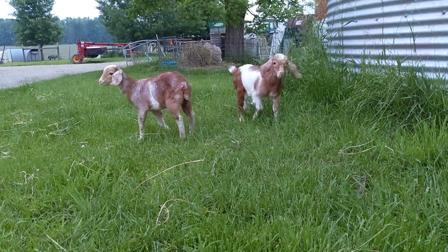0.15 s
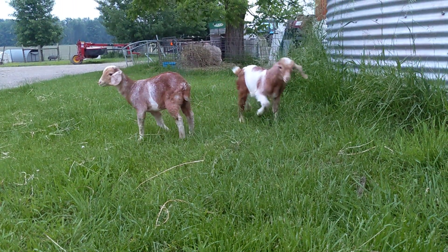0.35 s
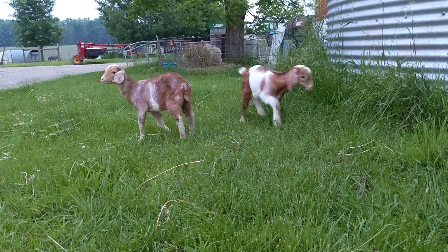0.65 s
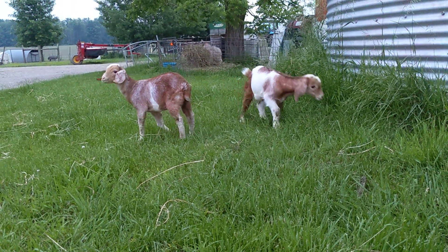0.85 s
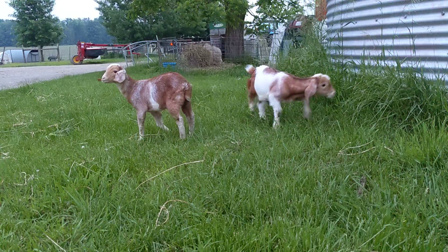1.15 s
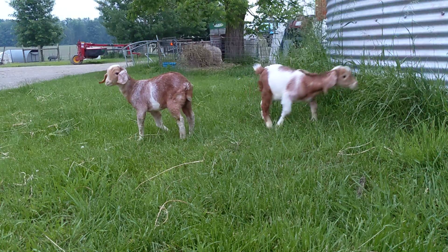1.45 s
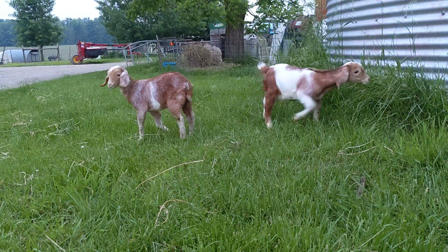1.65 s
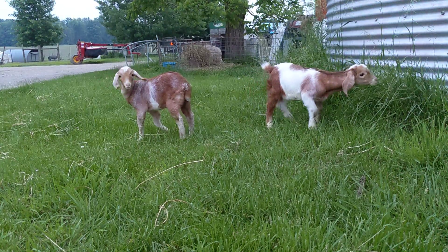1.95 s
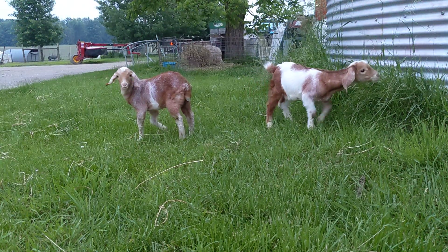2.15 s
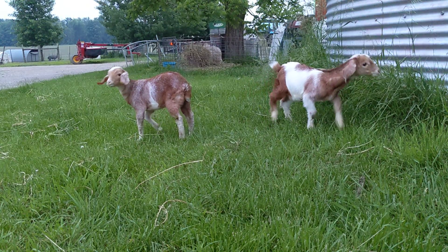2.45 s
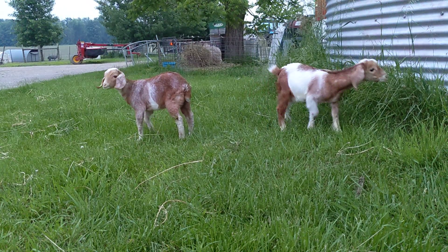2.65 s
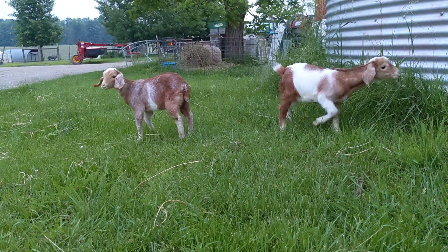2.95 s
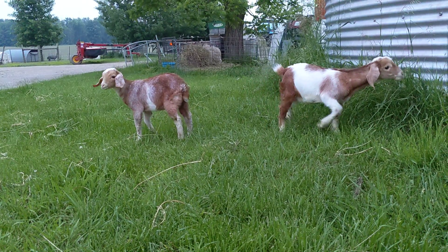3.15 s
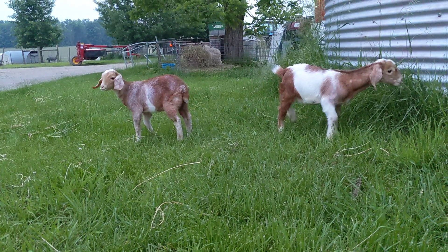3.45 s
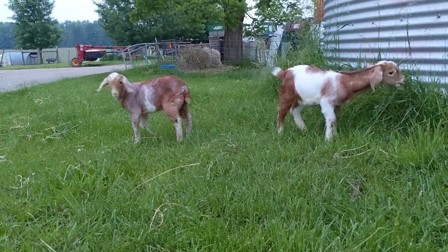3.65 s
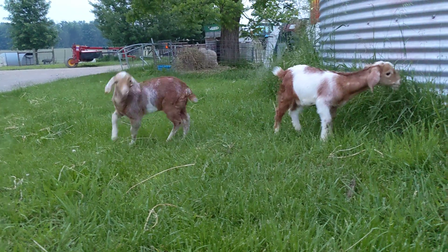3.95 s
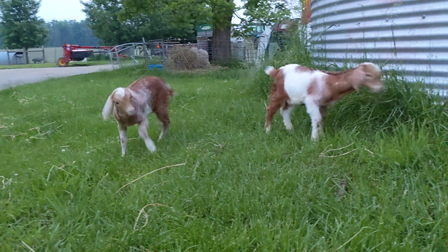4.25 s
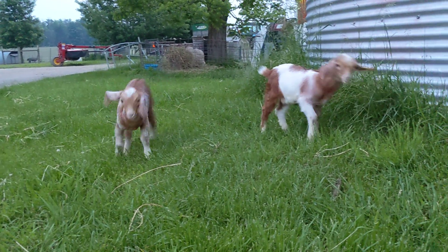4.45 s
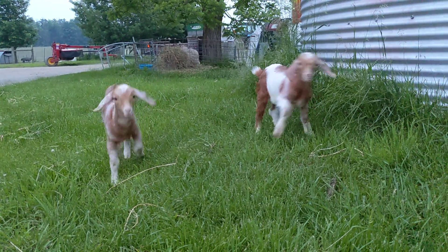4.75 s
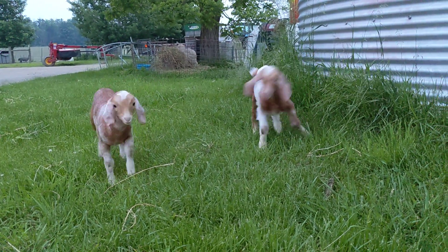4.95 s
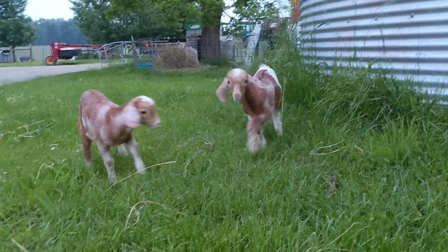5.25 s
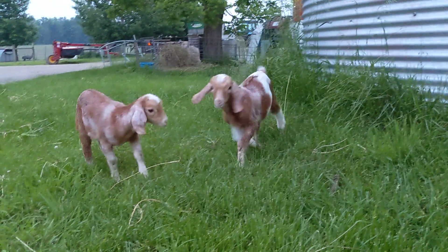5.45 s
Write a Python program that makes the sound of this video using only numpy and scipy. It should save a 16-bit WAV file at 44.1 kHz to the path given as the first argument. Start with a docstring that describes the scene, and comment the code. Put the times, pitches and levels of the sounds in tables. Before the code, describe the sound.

Over a beating low hum and faint open-air hiss, kid goats give three shaky bleats amid grass rustles, stem snaps and far chirps.

```python
"""Two machine hums, 11 Hz apart, beat over a low rumble and far open-air hiss; grass rustles and snaps
close by, and soft knocks are bumps on the hand-held camera. On the lawn beside a tin shed two goat kids
bleat three times: harmonics through a throat, quavering about 14 times a second. Far birds chirp as short
gliding tones. Two spaced microphones hear each source at its own lag."""
import sys
import numpy as np
from scipy import signal
from scipy.fft import rfft, irfft, next_fast_len
from scipy.io import wavfile
from scipy.ndimage import uniform_filter1d, map_coordinates

SR = 44100
rng = np.random.default_rng(int(sys.argv[2]) if len(sys.argv) > 2 else 0)


def digitize_waveform(pressure):
    """Quantize a signal to 16-bit integers and store it at the path in sys.argv[1].

    Rows of a 2-D input are taken as channels; values are limited to [-1, 1].
    """
    field = np.atleast_2d(pressure).T
    bounded = np.clip(field, -1, 1)
    quanta = np.round(bounded * 32767).astype(np.int16)
    wavfile.write(sys.argv[1], SR, quanta)


N = 247401
T = np.arange(N) / SR  # s
TOP_HZ = 15700  # band limit of the camera

# The two machine hums: low and high pitch in Hz.
HUM_HZ = (120.0, 131.11)
BEAT_S = .069  # a moment when both hums push together
# Course of the machines. Each row: time in seconds, low hum in dB, high hum in dB, rumble in dB.
MACHINE_LEVELS = [(0, -73, -60.5, -63.5), (.4, -57.5, -73, -69), (.75, -76, -57, -65.5),
                  (1, -65, -57.5, -65.5), (1.3, -58, -51.5, -60.5), (1.75, -61, -57, -66),
                  (2.1, -54, -48.5, -61.5), (2.3, -49.5, -54, -58), (2.55, -57, -56.5, -65),
                  (3, -54.5, -51, -58.5), (3.25, -58, -53, -61.5), (3.5, -61, -67, -70),
                  (3.75, -58, -55, -62.5), (4.2, -52, -51.5, -59.5), (4.9, -52.5, -51, -58.5),
                  (5.61, -51, -53.5, -56.5)]
# Weaker lines that swell with the rumble. Each row: pitch in Hz, level in dB while the rumble is at -59.5 dB.
FAINT_HUMS = [(37.35, -81.5), (199.8, -74), (240.0, -69)]
# Colour of the rumble. Each row: frequency in Hz, relative density in dB per Hz.
RUMBLE_SPECTRUM = [(90, -50), (140, 4), (160, 0), (200, -5), (260, -7.5), (315, -8.5), (360, -24),
                   (450, -42), (600, -57.5)]
# Colour of the deepest rumble. Each row: frequency in Hz, relative density in dB per Hz.
DEEP_SPECTRUM = [(15, -62), (26, -39), (40, -8.5), (55, 3), (72, 3.5), (92, 4.5), (115, 17), (150, -12),
                 (300, -52)]

# Colour of the open air. Each row: frequency in Hz, relative density in dB per Hz.
AIR_SPECTRUM = [(190, -6), (330, -7), (448, -6), (599, -5), (941, -6), (1040, -4), (1410, -4.5),
                (1580, -12.5), (2320, -11.5), (2510, -10.5), (4710, -15), (8840, -20), (10900, -27),
                (13700, -22), (15500, -27)]
# Course of the open air. Each row: time in seconds, level in dB.
AIR_LEVELS = [(0, -63), (.5, -66.5), (1, -62.5), (1.7, -61.5), (2.3, -61.5), (2.8, -63), (3.6, -61),
              (4.2, -59.5), (4.9, -61), (5.61, -62)]
# Part of a noise that arrives from one side. Each row: frequency in Hz, share of the power 0-1.
SHARE_FROM_SIDE = [(40, 0.6), (130, 1), (300, 0.97), (700, 0.32), (1400, 0.15), (3000, 0), (8000, 0)]

# Colour of the blades' fine hiss. Each row: frequency in Hz, relative density in dB per Hz.
BLADE_SPECTRUM = [(700, -20), (1500, -8), (3000, -13), (6000, -2.5), (9000, 0), (11000, -4), (14000, -0.5),
                  (16000, -12)]
# Colour of the stems' coarse scuff. Each row: frequency in Hz, relative density in dB per Hz.
STEM_SPECTRUM = [(500, -12.5), (1000, 1.5), (1600, 2), (2400, 0.5), (3300, 3), (4500, -8.5), (7000, -19)]
# The grass never rests: hiss in dB, scuff in dB.
STIR_DB = (-79, -73)
# Hooves and mouths in the grass. Each row: peak in seconds, rise and fall in seconds per 10 dB,
# fine hiss in dB, coarse scuff in dB.
BRUSHES = [(.1, 0.33, 0.13, -64, -71), (.142, 0.014, 0.08, -80, -66.5), (.315, 0.033, 0.052, -61.5, -51.5),
           (.515, 0.14, 0.073, -70, -70), (.605, 0.019, .12, -73, -62.5), (.765, 0.093, 0.18, -67.5, -75),
           (.838, 0.045, 0.055, -83, -56.5), (1.02, 0.023, 0.1, -70.5, -79),
           (1.83, 0.052, 0.11, -68, -66.5), (1.892, .05, 0.083, -77, -64), (2.03, 0.072, 0.052, -69.5, -81),
           (2.37, 0.07, .05, -90, -61.5), (2.444, .01, .08, -65.5, -71), (2.6, .05, 0.098, -65, -77),
           (2.748, 0.0055, 0.0083, -82, -67), (2.835, .02, 0.069, -78, -60), (3.62, .025, 0.029, -61, -85),
           (4.08, .03, 0.026, -74, -85), (4.216, .025, 0.018, -73, -85), (4.375, 0.096, 0.048, -60.5, -71),
           (4.54, .12, .09, -66.5, -85), (4.7, 0.014, .1, -63, -63), (4.78, 0.051, .05, -58, -64),
           (4.916, .012, 0.065, -76, -66), (4.974, 0.067, 0.023, -67.5, -80),
           (5.174, 0.12, 0.032, -65.5, -85), (5.31, 0.038, .08, -68, -80), (5.44, 0.093, .04, -59.5, -81),
           (5.56, 0.1, 0.027, -64, -86)]
# Stems that snap. Each row: start in seconds, strength in dB, treble over strength in dB.
SNAPS = [(0.1166, -49, -12), (0.1306, -41, -18), (0.2623, -49, -20), (0.2803, -40, -22), (0.2944, -45, -16),
         (0.3014, -43, -17), (0.3114, -39, -22), (0.3272, -32, -29), (0.3634, -51, -17), (0.3895, -48, -22),
         (0.617, -47, -24), (0.6294, -51, -19), (0.7771, -53, -14), (0.823, -46, -20), (0.8395, -37, -29),
         (0.8534, -49, -19), (1.8083, -52, -17), (1.8243, -47, -20), (2.7472, -48, -23), (4.6874, -52, -7),
         (4.9142, -50, -18)]
# Ringing of a snapped stem. Each row: resonance in Hz, width in Hz, gain in dB.
SNAP_RING = [(2290, 410, 5.5), (3780, 490, -1.5), (1210, 180, 3)]

# Knocks on the camera. Each row: time in seconds, strength in dB, pitch it settles to in Hz,
# left over right in dB.
BUMPS = [(.03, -45, 108, 20), (0.433, -52, 85, 24), (0.571, -46, 81, 18), (0.941, -43, 111, 10),
         (2.592, -46.5, 82, -11), (4.75, -63, 80, 6), (5.419, -61, 81.4, -1)]

# Throat and mouth of each bleat. Each row: frequency in Hz, relative gain in dB.
THROAT_1 = [(950, -9), (1080, -4.5), (1440, 2.5), (1640, -1.5), (1900, -3), (2190, -1), (2700, -5.5),
            (4950, -4), (5450, -17.5), (7400, -18), (8150, -14.5), (9700, -24), (12200, -27.5),
            (13500, -53)]
THROAT_2 = [(800, -15.5), (1230, -8), (1660, -4), (2000, -17), (2800, -13.5), (3350, -5.5), (5000, -6),
            (5500, -15), (6200, -12), (7000, 2), (8300, -27), (9600, -22.5), (12000, -28), (13500, -26)]
THROAT_3 = [(1060, -1), (1560, 9.5), (2100, 5.5), (2660, -11), (3190, 7.5), (3730, 0.5), (4790, -0.5),
            (5250, -10.5), (5600, -22), (6400, -9), (6900, -19), (8000, -13), (9100, -16.5), (12400, -18),
            (13800, -48)]
# The calls. Each row: start in seconds, first pitch in Hz, end in seconds, last pitch in Hz,
# treble over level in dB, place between two pushes (0-1) of the weakest level and of the pitch's turn,
# first lag of the pitch behind the push in seconds.
BLEATS = [(1.168, 474, 1.612, 444, -0.6, .4, .33, 0.0063), (2.806, 424.7, 3.6, 322, -5, 0.51, .55, 0.0218),
          (3.676, 465, 4.055, 440, 7, .45, .42, .002)]
# Pushes of the belly. Each row: time in seconds, pitch in Hz, level in dB, fundamental over level in dB,
# rasp at the lips in dB.
THROBS = [(1.201, 495, -48.5, -5.5, -83), (1.265, 529, -46.5, -7.9, -68), (1.349, 543, -47.5, -7.5, -63),
          (1.41, 553, -46, -8.3, -59), (1.472, 557, -44.5, -9, -59), (1.535, 555, -44, -12.5, -58.5),
          (1.596, 468, -48.5, -19, -60), (2.822, 340.6, -58, 4, -67), (2.899, 342.7, -51, 4, -53.5),
          (2.978, 356.4, -52, 5.5, -53), (3.063, 389.7, -50.5, 8, -58), (3.132, 402.8, -50.4, 8.5, -55.5),
          (3.209, 408.6, -51, 9.5, -57), (3.284, 412.6, -51.5, 6, -60), (3.36, 419, -51, 3.5, -67),
          (3.45, 422.3, -51.5, 3.3, -71), (3.538, 404, -52, 6.5, -80), (3.587, 340, -59.5, 0, -76),
          (3.709, 531.6, -47, -5, -64), (3.78, 535.5, -47, -4.8, -55), (3.848, 530, -47.2, -0.7, -57.5),
          (3.925, 540, -49.5, -4, -55), (3.985, 509.6, -53, -12.3, -57), (4.018, 468, -58.5, -16, -56),
          (4.045, 444, -60, -14, -59)]
# Slack between pushes, one row a call: extra pitch shift in Hz, its fading in seconds, lasting shift in Hz,
# extra dip in dB, its fading in seconds, lasting dip in dB, rasp dip in dB.
QUAVERS = [(-45, .14, -13, 2, .2, 5, .6), (80, .23, .6, 42, .085, 1.5, 15),
           (-200, .055, -15, 7, .12, 4.5, .6)]
# The voice starts just under its first push, then falls away after the end.
ONSET_DB, ONSET_S = -3, .008
RELEASE_DB, RELEASE_S = -10.5, .023
DULL_EDGE_DB = -7.5  # treble of the first and last push
# Rasp at the lips out on the lawn. Each row: frequency in Hz, relative density in dB per Hz.
LIPS_ON_LAWN = [(5000, -4), (7500, -5), (9500, 6), (10500, -9), (12000, -2.5), (13200, -15), (15500, -30)]
# Rasp at the lips by the wall. Each row: frequency in Hz, relative density in dB per Hz.
LIPS_NEAR_WALL = [(5500, -21), (7000, -8), (9000, -2), (10500, -10), (12000, -2), (13200, -14),
                  (15500, -26)]
# Direct sound, ground and wall add differently at the two microphones.
# Each row: frequency in Hz, lead of the left in radians, left over right in dB.
NEAR_WALL = [(100, .1, 0), (530, .55, 3), (1070, 1.45, 3), (1620, 2.3, -5), (2120, 4.2, 1), (2200, 6.3, 1),
             (2700, 7.8, -5), (3200, 8.7, 7), (3750, 9.8, -8), (4300, 9.5, 10), (4750, 10.3, -3),
             (4950, 12.6, 0), (6300, 12.6, -1), (9500, 22, 2), (13000, 28, 3)]
# The same for the kid out on the lawn: frequency in Hz, left lead in radians, left over right in dB.
ON_LAWN = [(100, 0, 0), (420, 0, 0), (820, 0, -2), (1250, .2, 5), (1680, .3, 0), (2500, 1.7, -3),
           (3300, 2.3, 2), (5000, 1.9, -2), (7000, 3, -1), (9000, 6, 1), (13000, 8, 2)]

# Far birds. Each row: start in seconds, length in seconds, first pitch in Hz, last pitch in Hz, level in dB.
CHIRPS = [(3.48, 0.052, 2900, 2380, -63), (3.61, 0.019, 2530, 2804, -66.5), (4.09, 0.017, 3840, 3930, -67),
          (4.115, 0.029, 3920, 3920, -69), (4.15, 0.028, 3950, 3840, -72), (5.145, .035, 2350, 2400, -87),
          (5.19, 0.067, 2950, 2470, -70.5), (5.255, .03, 2530, 2450, -72), (5.285, .03, 2930, 3030, -73),
          (5.325, 0.043, 2580, 2850, -73), (5.42, 0.043, 2250, 2380, -72)]


def amp(db):
    """Amplitude factor of a level in dB."""
    return 10 ** (np.asarray(db) / 20)


def unit(x):
    """x scaled to rms 1."""
    return x / np.sqrt(np.mean(x ** 2) + 1e-20)


def along(points, hz):
    """Values of (Hz, value) points, joined on a log frequency axis."""
    f, v = np.transpose(points)
    return np.interp(np.log(hz + 1), np.log(f + 1), v)


def curves(rows):
    """One value per sample for each column after the time."""
    s, *columns = np.transpose(rows)
    return [np.interp(T, s, column) for column in columns]


def wobble(rate):
    """A smooth random curve, rate knots a second."""
    knots = rng.standard_normal(int(N * rate / SR) + 4)
    return map_coordinates(knots, [T * rate])


def filtered(x, response):
    """x shaped by a complex response of frequency."""
    m = next_fast_len(N + SR // 2)
    return irfft(rfft(x, m) * response(np.fft.rfftfreq(m, 1 / SR)), m)[..., :N]


def placed(x, lag_ms, pan_db):
    """The right microphone hears x lag_ms after the left; the left is pan_db louder."""
    side = np.array([[-.5], [.5]])
    return filtered(x, lambda f: amp(-side * pan_db) * np.exp(-2j * np.pi * f * side * lag_ms / 1000))


def heard(x, paths):
    """Give each microphone half of the lead and of the level difference along these paths."""
    rows, side = np.array(paths), np.array([[.5], [-.5]])

    def response(f):
        lead = np.interp(f, rows[:, 0], rows[:, 1])
        return amp(side * along(rows[:, [0, 2]], f)) * np.exp(1j * side * lead)

    return filtered(x, response)


def rush(spectrum, patchy_db, lag_ms):
    """Patchy stereo noise of rms 1: part comes from one side, part from all around."""
    z = signal.stft(rng.standard_normal((3, N)), nperseg=512)[2]
    patches = uniform_filter1d(rng.standard_normal(z.shape[1:]), 6, 0)
    patches = unit(uniform_filter1d(patches, 10, 1))
    noise = signal.istft(z * amp(patchy_db * patches), nperseg=512)[1][:, :N]
    share = lambda f: np.clip(along(SHARE_FROM_SIDE, f), 0, 1)
    one_side = placed(filtered(noise[0], lambda f: np.sqrt(share(f))), lag_ms, 0)
    around = filtered(noise[1:], lambda f: np.sqrt(1 - share(f)))
    return unit(filtered(one_side + around, lambda f: amp(along(spectrum, f))))


def crackle(spectrum, spiky_db, channels):
    """Noise of rms 1 in flicks of about a millisecond and very unequal size."""
    sizes = np.minimum(rng.exponential(size=(channels, N // 40 + 1)), 4)
    flicks = amp(spiky_db * sizes.repeat(40, 1)[:, :N])
    noise = flicks * rng.standard_normal((channels, N))
    return unit(filtered(noise, lambda f: amp(along(spectrum, f))))


def machines():
    """Two steady hums beat; a rumble with weaker, wavering lines swells with them."""
    low_db, high_db, rumble_db = curves(MACHINE_LEVELS)
    hums = np.zeros(N)
    for hz, db in zip(HUM_HZ, (low_db, high_db)):
        level = np.sqrt(2) * amp(db + 2.03 * wobble(6.6))
        drift = .2 * wobble(5)  # moving air shifts each hum's phase a little (radians)
        hums += level * np.cos(2 * np.pi * hz * (T - BEAT_S) + drift)
    for hz, db in FAINT_HUMS:
        level = np.sqrt(2) * amp(db + rumble_db + 59.5 + 1.6 * wobble(3.92))
        hums += level * np.sin(2 * np.pi * hz * T)
    rumble = amp(rumble_db + 2.2 * wobble(4.6)) * rush(RUMBLE_SPECTRUM, patchy_db=0, lag_ms=.37)
    # The deepest part follows the rumble's level less than half as far.
    deep_db = -67.5 + .42 * (rumble_db + 75) + .96 * wobble(3.2)
    deep = amp(deep_db) * rush(DEEP_SPECTRUM, patchy_db=1.5, lag_ms=.56)
    return placed(hums, lag_ms=.33, pan_db=.3) + rumble + deep


def air():
    """Far open-air hiss with a flickering narrow whistle, a resonant band of noise, in it."""
    level_db = curves(AIR_LEVELS)[0]
    resonance = lambda f: 1 / (1 + ((f - 2320) / 90) ** 2)  # Hz
    whistle = unit(filtered(rng.standard_normal(N), resonance))
    whistle = placed(amp(-77 + 3.5 * wobble(20)) * whistle, lag_ms=.42, pan_db=-8)
    hiss = amp(level_db + .6 * wobble(7.4)) * rush(AIR_SPECTRUM, patchy_db=2, lag_ms=.391)
    return hiss + whistle


def snapping_stems():
    """A stem tears briefly, then gives way at once: the blow rings its resonances, with a treble tick."""
    blows, ticks = np.zeros(N), np.zeros(N)
    for s, db, treble_db in SNAPS:
        burst = np.exp(-np.arange(80) / 9) * rng.standard_normal((2, 80))
        burst /= np.linalg.norm(burst, axis=1, keepdims=True)
        start = round(s * SR)
        blows[start + 40] += amp(db + 20)
        blows[start:][:80] += amp(db + 7.5) * burst[0]
        ticks[start:][:80] += amp(db + treble_db + 15) * burst[1]

    def ring(f):
        """Resonances of alternating sign."""
        total = 0
        for k, (hz, width, db) in enumerate(SNAP_RING):
            damping = 1j * f * width
            total = total + (-1) ** k * amp(db) * damping / (hz * hz - f * f + damping)
        return total

    return filtered(blows, ring) + filtered(ticks, lambda f: f ** 4 / (f ** 4 + 5000 ** 4))


def grass():
    """Hooves and mouths brush the blades: fine hiss, coarser scuff of stems, and stems that snap."""
    power = amp(np.array(STIR_DB)[:, None] + 4 * wobble(14)) ** 2
    for s, rise_s, fall_s, *dbs in BRUSHES:
        away = np.maximum((s - T) / rise_s, (T - s) / fall_s)
        power = power + amp(np.array(dbs)[:, None] - 10 * away) ** 2
    hiss_level, scuff_level = np.sqrt(power)
    left_right = amp([[1.5], [-1.5]])
    hiss = hiss_level * crackle(BLADE_SPECTRUM, spiky_db=3, channels=2) * left_right
    scuff = scuff_level * crackle(STEM_SPECTRUM, spiky_db=3.6, channels=1)[0]
    return hiss + placed(snapping_stems() + scuff, lag_ms=.43, pan_db=-9)


def bumps():
    """Soft knocks on the camera body: a few falling cycles, unequal at the two microphones."""
    out, t = np.zeros((2, N + SR)), np.arange(SR // 8) / SR
    for s, db, hz, pan_db in BUMPS:
        cycles = hz * (t + .0036 * (1 - np.exp(-t / .0076)))
        knock = np.sin(2 * np.pi * cycles) * (t / .0082) * np.exp(1 - t / .0089)
        cut_db = np.maximum([[-pan_db], [pan_db]], 0)  # only the weaker side is cut
        start = round(s * SR) - 300  # the knock builds up over some milliseconds
        out[:, start:][:, :len(t)] += amp(db + 3.5 - cut_db) * knock
    return out[:, :N]


def bleat(call, quaver, throat, slack_db, jitter, flutter_db, breath_db, crack_db, hoarse_db, muffle_db):
    """Harmonics of the vocal folds through the throat; between pushes the voice sags and its pitch shifts."""
    start_s, start_hz, end_s, end_hz, treble_db, slack_at, turn_at, lag_s = call
    shift_hz, shift_s, lasting_hz, extra_db, extra_s, dip_db, rasp_dip_db = quaver
    pushes = [row for row in THROBS if start_s < row[0] < end_s]
    push_s, push_hz, push_db, low_db, push_rasp_db = np.transpose(pushes)
    slack_s = np.r_[start_s, push_s[:-1] + slack_at * np.diff(push_s)]
    turn_s = np.r_[start_s, push_s[:-1] + turn_at * np.diff(push_s)]
    between = lambda v: np.interp(slack_s, push_s, v)
    since_start = slack_s - start_s

    # Values in the slack before each push; the first stands for the start of the call.
    slack_hz = between(push_hz) + lasting_hz + shift_hz * np.exp(-since_start / shift_s)
    slack_hz[0] = start_hz
    sag_db = between(push_db) - dip_db - extra_db * np.exp(-since_start / extra_s)
    sag_db[0] = push_db[0] + ONSET_DB
    sag_rasp_db = between(push_rasp_db) - rasp_dip_db
    sag_rasp_db[0] = push_rasp_db[0] + 2 * ONSET_DB
    on = (T > start_s - ONSET_S) & (T < end_s + RELEASE_S)
    t, zero = T[on], 0 * slack_s

    def glide(first, a, b, last, troughs=slack_s, crests=push_s):
        """From value a between pushes to b on them, with round crests and troughs."""
        turns = np.r_[start_s - ONSET_S, np.ravel([troughs, crests], "F"), end_s, end_s + RELEASE_S]
        values = np.r_[first, np.ravel([a, b], "F"), last]
        step = np.interp(t, turns, np.arange(len(turns)))
        step = np.floor(step) + .5 - .5 * np.cos(np.pi * (step % 1))
        return np.interp(step, np.arange(len(turns)), values)

    def fading(a, b):
        """A glide in dB that rises from 25 dB below its start and dies away after the last push."""
        return glide(a[0] - 25, a, b, [b[-1] + RELEASE_DB, b[-1] - 38])

    # Loose folds as the call starts and runs out.
    loose_s = [start_s + .035, start_s + .06, end_s - .08, end_s - .04]
    hoarse = np.interp(t, loose_s, [crack_db, 0, 0, hoarse_db])
    pitch_crest_s = push_s + lag_s * np.exp(-(push_s - start_s) / shift_s)
    pitch = glide(slack_hz[0], slack_hz, push_hz, [end_hz, end_hz], turn_s, pitch_crest_s)
    pitch = pitch * (1 + jitter * amp(2 * hoarse) * wobble(250)[on])
    level = fading(sag_db, push_db)
    # Fundamental and breath fade most when the push slackens.
    slack = glide(0, slack_db + zero, zero, [0, 0])

    k = np.arange(1, 31)[:, None]  # harmonic numbers
    flutter = np.array([wobble(30)[on] for _ in k])
    gain = amp(along(throat, k * pitch) + flutter_db * flutter)
    gain[0] = amp(np.interp(t, push_s, low_db) + slack)
    # The mouth narrows as the fundamental swells: the fourth harmonic weakens.
    swell = glide(0, zero, np.clip(low_db / low_db.max(), 0, 1), [0, 0])
    gain[3] *= amp(muffle_db * swell ** 2)
    gain[1:4] /= np.sqrt(np.sum(gain[1:4] ** 2, 0))  # harmonics 2-4 carry the level
    high_db = treble_db + DULL_EDGE_DB * np.isin(push_s, push_s[[0, -1]])
    high_db = np.r_[high_db[0] + 2 * DULL_EDGE_DB, high_db]  # dullest at the very start
    treble = amp(np.interp(t, np.r_[start_s, push_s], high_db))
    gain[4:] *= treble / np.sqrt(np.sum(gain[4:12] ** 2, 0))

    phase = 2 * np.pi * np.cumsum(pitch) / SR
    voice, puff, rasp = np.zeros((3, N))
    harmonics = gain * np.sin(k * phase + rng.uniform(0, 2 * np.pi, k.shape))
    voice[on] = np.sqrt(2) * amp(level) * np.sum(harmonics, 0)
    # Air hisses through the folds once a cycle.
    puff[on] = amp(level + breath_db + slack + hoarse) * (1 + np.cos(phase))
    breath = filtered(rng.standard_normal(N), lambda f: amp(along(throat, f)) * f / (f + 4000))
    rasp[on] = amp(fading(sag_rasp_db, push_rasp_db))
    return voice + puff * unit(breath), rasp


def goats():
    """One kid calls twice by the wall, the other once, hoarser, out on the lawn; the yard answers faintly."""
    first, rasp_1 = bleat(BLEATS[0], QUAVERS[0], THROAT_1, slack_db=-4, jitter=.0018, flutter_db=2.2,
                          breath_db=-18, crack_db=3, hoarse_db=5, muffle_db=0)
    second, rasp_2 = bleat(BLEATS[1], QUAVERS[1], THROAT_2, slack_db=-7, jitter=.008, flutter_db=2.8,
                           breath_db=-8, crack_db=7, hoarse_db=2, muffle_db=-24)
    third, rasp_3 = bleat(BLEATS[2], QUAVERS[2], THROAT_3, slack_db=-7, jitter=.0018, flutter_db=2.2,
                          breath_db=-17, crack_db=4, hoarse_db=13, muffle_db=0)
    t = np.arange(SR // 4) / SR
    tail = rng.standard_normal((2, len(t))) * amp(-60 * t / .22)  # falls 60 dB in .22 s
    tail /= np.linalg.norm(tail[0])
    yard = signal.fftconvolve((first + second + third)[None], tail, axes=1)[:, :N]
    # Air past teeth and lips.
    rasp = rasp_2 * crackle(LIPS_ON_LAWN, spiky_db=-3, channels=2)
    rasp += (rasp_1 + rasp_3) * crackle(LIPS_NEAR_WALL, spiky_db=2, channels=2)
    return rasp + heard(first + third, NEAR_WALL) + heard(second, ON_LAWN) + amp(-15) * yard


def birds():
    """Short gliding whistles from far trees: sines under a round swell, stronger on the right."""
    out = np.zeros(N)
    for s, length_s, from_hz, to_hz, db in CHIRPS:
        n = round(length_s * SR)
        phase = 2 * np.pi * np.cumsum(np.linspace(from_hz, to_hz, n)) / SR
        out[round(s * SR):][:n] += np.sqrt(2) * amp(db) * np.hanning(n) ** .5 * np.sin(phase)
    return placed(out, lag_ms=.037, pan_db=-13)


def scene():
    """All sources as they add up at the two microphones."""
    return machines() + air() + grass() + bumps() + goats() + birds()


def record(dry):
    """The camera keeps nothing above its band limit."""
    return filtered(dry, lambda hz: hz < TOP_HZ)


dry = scene()
out = record(dry)
digitize_waveform(out)
```